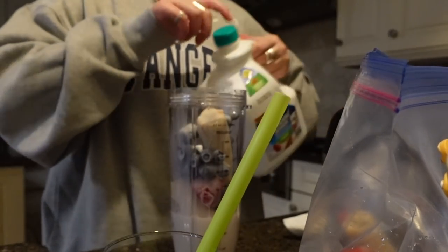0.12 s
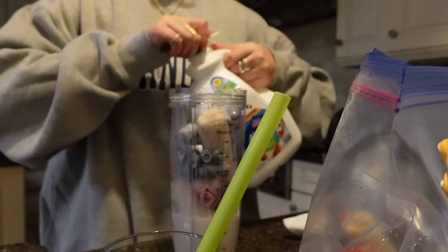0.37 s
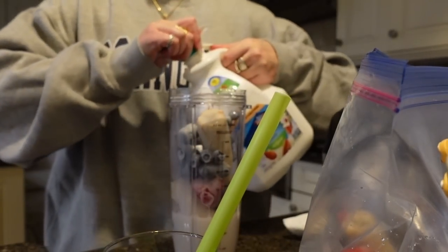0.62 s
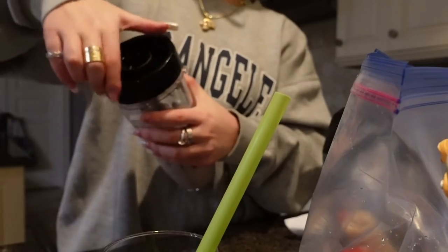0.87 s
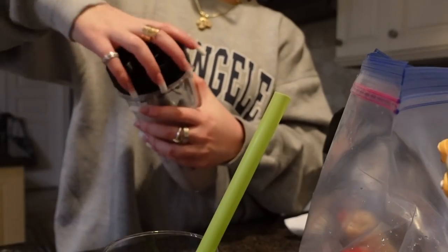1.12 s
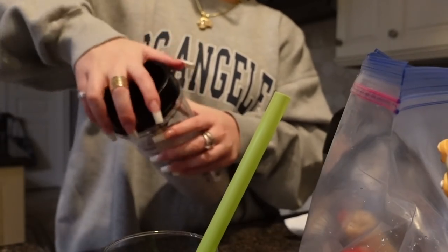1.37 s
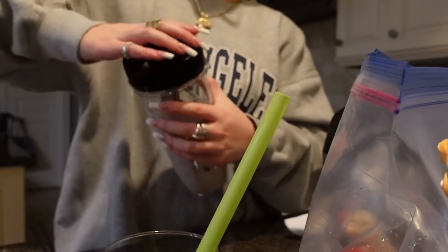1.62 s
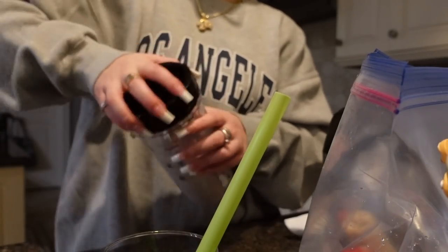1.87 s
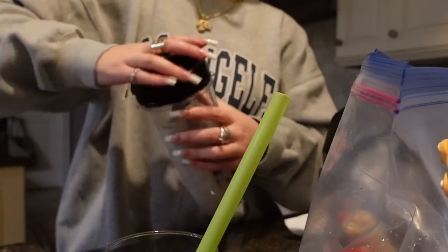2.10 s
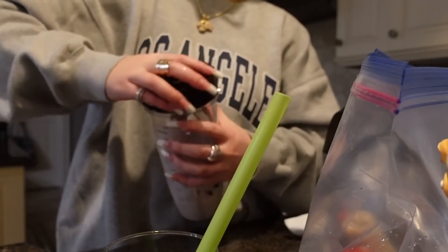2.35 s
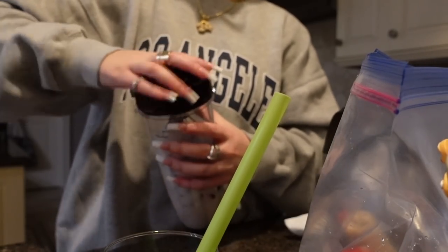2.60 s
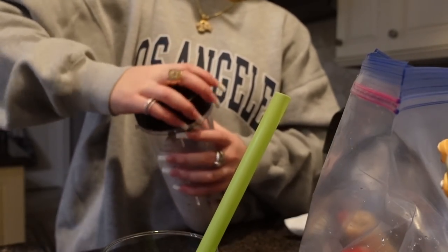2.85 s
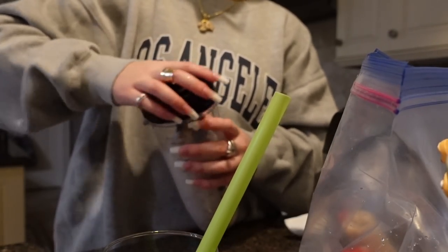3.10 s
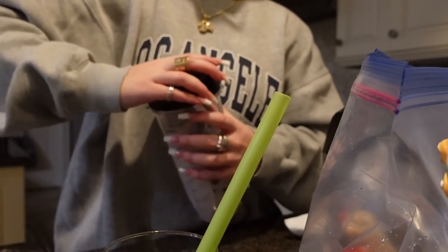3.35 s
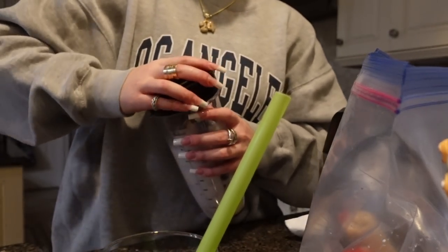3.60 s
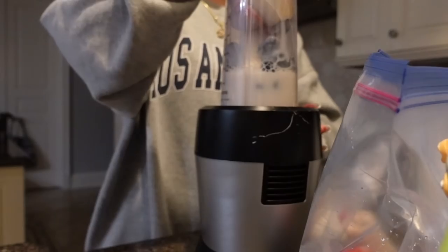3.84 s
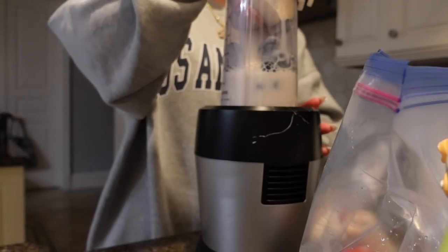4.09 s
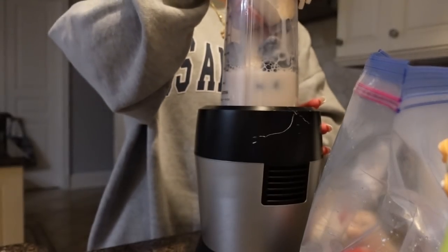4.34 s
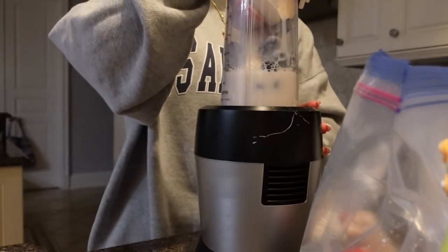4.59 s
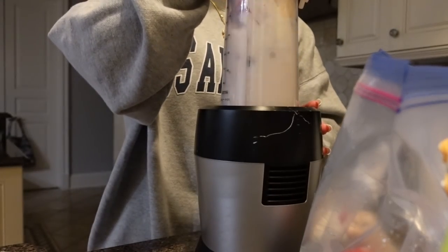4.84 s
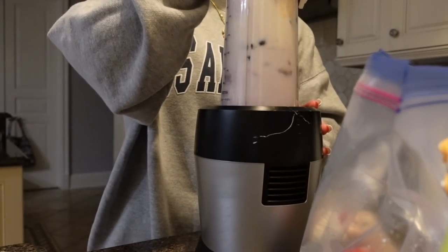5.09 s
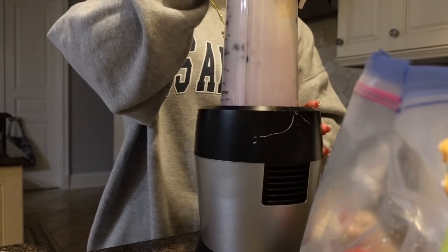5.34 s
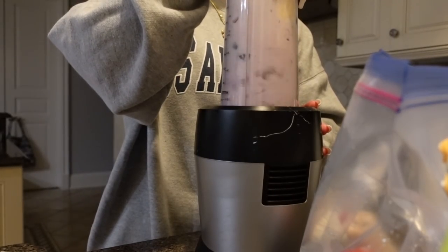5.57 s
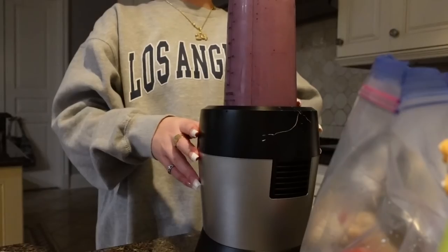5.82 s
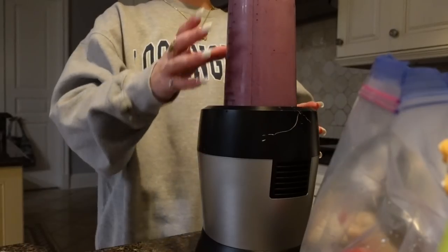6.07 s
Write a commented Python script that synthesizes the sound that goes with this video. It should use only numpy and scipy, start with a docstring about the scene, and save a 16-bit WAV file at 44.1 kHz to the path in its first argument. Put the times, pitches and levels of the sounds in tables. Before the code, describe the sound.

Plastic cup and lid clicking, scraping and knocking in a kitchen, one heavy thud, then a small blender roars up and whines down.

```python
"""A kitchen blender seen close up by two microphone ports: it is loaded and closed, then spins up and runs down.
Plastic ticks and scrapes are short noises coloured by the cup; steel blade and finger rings are ringing modes.
Skin and cloth hiss, and something heavy thuds on the counter. At 3.81 s the appliance hum, the rubbing and
the thud's boom all drop abruptly together; the cup clicks into its base and the motor starts: shaft tones,
chopping noise and roar. At 5.828 s it goes at once to coasting, with slot harmonics sweeping down."""
import sys
import numpy as np
from scipy import signal
from scipy.io import wavfile

SR = 44100
rng = np.random.default_rng(int(sys.argv[2]) if len(sys.argv) > 2 else 0)


def volts(x):
    """Linear amplitude factor 10**(x/20) for a level x in dB, scalar or array-like."""
    e = np.asarray(x, float) / 20
    return 10 ** e


def int16_out(signal):
    """Quantize to a 16-bit WAV file."""
    q = np.round(np.clip(np.atleast_2d(signal).T, -1, 1) * 32767)
    wavfile.write(sys.argv[1], SR, q.astype(np.int16))


N = 273420

# appliance background; rubbing and thud drop along with it at its third row: time_s, level_db
BACKGROUND_LEVEL = [(0, -41.5), (3.806, -41.5), (3.81, -54.5), (6.2, -50)]
# motor shaft, spinning up and then running down: time_s, speed_turns_per_s
SHAFT_SPEED = [(4.69, 60), (4.8, 120), (4.97, 190), (5.04, 212), (5.1, 228), (5.17, 235), (5.38, 244.5),
               (5.6, 253.5), (5.825, 254.5), (5.83, 287), (5.885, 267), (6.02, 200), (6.11, 160),
               (6.2, 127)]
# tones of the shaft ahead of the body resonances: multiple_of_speed, powered_rms_db, coasting_rms_db
SHAFT_ORDERS = [(1, -42.5, -56), (1.5, -39.5, -33.5), (2, -41, -44.5), (3, -41.5, -54), (4.5, -45, -75),
                (6, -44, -65), (12, -34.5, -71)]
# resonances of base and cup under power: pitch_hz, width_hz, lift_db
POWERED_BODY = [(307, 79, 4.5), (728, 36, 9), (2390, 65, -3), (2564, 44, 5), (2600, 25, 8.5),
                (2757, 34, 7.5), (2988, 170, 8), (3636, 50, 9), (5660, 430, 3)]
# resonances of base and cup when coasting: pitch_hz, width_hz, lift_db
COASTING_BODY = [(307, 33, 10.8), (750, 41, 9), (905, 24, 10.7), (1240, 63, 7), (1335, 82, 12.8),
                 (1443, 90, 8.4), (1920, 110, 5), (2980, 440, 6), (9500, 140, 8.2)]
COAST_S = 5.828  # the motor coasts from here


def rms_one(x):
    """Scale to rms 1."""
    return x / np.sqrt(np.mean(x ** 2) + 1e-20)


def in_time(rows):
    """Columns of a curve table, one value a sample."""
    s, *columns = np.transpose(rows)
    return [np.interp(np.arange(N) / SR, s, c) for c in columns]


def at_hz(points, hz):
    """Read a (Hz, value) table on a log axis."""
    table_hz, values = np.array(points)[:, 0], np.array(points)[:, 1]
    return np.interp(np.log(hz), np.log(table_hz), values)


def drift(rate_hz, size):
    """Slow chance with spread 1: low-passed noise, drawn every 40th sample and joined by lines."""
    r = np.exp(-80 * np.pi * rate_hz / SR)
    white = rng.standard_normal(size // 40 + 1002)
    slow = signal.lfilter([1], [1, -2 * r, r * r], white)[1000:]
    return np.interp(np.arange(size) / 40, np.arange(len(slow)), rms_one(slow))


def resonate(x, hz, width_hz):
    """Two-pole resonance with gain 1 on top."""
    r = np.exp(-np.pi * width_hz / SR)
    poles = [1, -2 * r * np.cos(2 * np.pi * hz / SR), r * r]
    return signal.lfilter([(1 - r * r) / 2, 0, (r * r - 1) / 2], poles, x + 1e-18)


def lift(x, modes):
    """Raise each resonance out of a broad sound."""
    return x + sum((volts(db) - 1) * resonate(x, hz, width) for hz, width, db in modes)


def ring(clicks, hz, t60):
    """A unit click sets a sine of height 1 ringing, down 60 dB after t60 seconds."""
    r, w = volts(-60 / (t60 * SR)), 2 * np.pi * hz / SR
    return signal.lfilter([0, np.sin(w)], [1, -2 * r * np.cos(w), r * r], clicks + 1e-18)


def band(x, low_hz, high_hz):
    """Butterworth band-pass."""
    return signal.sosfilt(signal.butter(2, [low_hz, high_hz], "band", fs=SR, output="sos"), x)


def noise(spectrum, size, modes=(), patchy_db=0., t60=None, side_db=None):
    """Stereo noise in about half-octave bands, each with level, flicker, width and optional decay; rms 1."""
    # usual stereo width at the ports: pitch_hz, side_against_mid_db
    usual_side = [(60, -9.5), (180, -19), (550, -9), (1650, -7), (4970, -10.5), (15000, -54)]
    if side_db is None:
        side_db = usual_side
    low_end, high_end = spectrum[0][0], spectrum[-1][0]
    edges = np.geomspace(low_end, high_end, 2 + int(2 * np.log2(high_end / low_end)))
    out, white = 0, rng.standard_normal((2, 2, size))
    for k, (low, high) in enumerate(zip(edges, edges[1:])):
        mid, side = band(white[k % 2], low, high)  # neighbouring bands use separate noise
        hz = np.sqrt(low * high)
        db = at_hz(spectrum, hz) + patchy_db * drift(26.5, size)
        if t60:
            db = db - 60 * np.arange(size) / SR / at_hz(t60, hz)
        out = out + volts(db) * (mid + volts(at_hz(side_db, hz)) * side * [[1], [-1]])
    return rms_one(lift(out, modes))


def background():
    """Broad appliance drone with wavering mains lines, over the sensor's hiss."""
    # drone spectrum: pitch_hz, relative_density_db
    drone = [(18, -63), (30, -28), (107, -9), (242, -1.5), (388, -8.5), (443, -11), (577, -11),
             (676, -18.5), (928, -24.5), (1800, -27.5), (2100, -38), (7090, -43), (15200, -55),
             (16500, -67)]
    # lines at the opening background level, before wavering: pitch_hz, peak_db
    hum_lines = [(119, -53), (204, -49), (241, -52), (479, -65), (899, -63.5)]
    t = np.arange(N) / SR
    level_db, first_db = in_time(BACKGROUND_LEVEL)[0], BACKGROUND_LEVEL[0][1]
    lines = sum(volts(db - first_db + 4.5 * drift(7.3, N)) * np.sin(2 * np.pi * hz * t) for hz, db in hum_lines)
    hum = volts(level_db) * (noise(drone, N, patchy_db=1.8) + lines)
    # the hiss follows the background by 0.4 dB per dB
    hiss = volts(-79 + .4 * (level_db - first_db)) * band(rng.standard_normal(N), 3000, 16000)
    return hum + hiss


def rubbing():
    """Fine friction hiss of skin and cloth in a low and a treble layer, until the motor starts."""
    # hands and cloth up to the abrupt drop: time_s, low_layer_db, treble_layer_db
    rub_levels = [(0.0, -53.5, -77), (0.2, -49.5, -62), (0.31, -53, -64), (0.66, -57, -73),
                  (0.9, -44.5, -66), (1.03, -55, -64), (1.73, -59, -62), (1.91, -49, -52),
                  (2.05, -61.5, -64), (2.33, -55, -61), (2.43, -54, -64.5), (2.88, -52, -63),
                  (3.29, -51.5, -72), (3.59, -52, -61), (3.8, -57, -67)]
    # low layer: pitch_hz, relative_density_db
    low_spectrum = [(710, -31.5), (1200, 5.5), (1830, -1), (2040, 5), (2520, -1.5), (4900, -6), (9000, -10),
                    (11700, -53), (19800, -120)]
    # treble layer: pitch_hz, relative_density_db
    treble_spectrum = [(3530, -39), (6000, 14), (10100, 2), (15200, 10.5), (16200, -11), (16500, -50)]
    time = np.arange(N)
    before = time < BACKGROUND_LEVEL[2][0] * SR
    low_db, treble_db = np.where(before, in_time(rub_levels), [[-71], [-81]])  # faint and steady afterwards
    low = volts(low_db) * noise(low_spectrum, N, patchy_db=.7)
    treble = volts(treble_db) * noise(treble_spectrum, N, patchy_db=.7)
    return (low + treble) * (time < SHAFT_SPEED[0][0] * SR)


def colour(contact, hz, octaves, treble_db):
    """Contact noise through the spot touched and the cup's modes, body peak 1, plus a bright edge."""
    # modes of the plastic cup: pitch_hz, width_hz, level_db
    cup_modes = [(1500, 300, -5), (2020, 350, -8), (3010, 350, -4), (4500, 500, -5), (5780, 500, -8),
                 (7200, 700, -5)]
    octaves = np.clip(octaves, .15, 1.5)
    edges = hz / 2 ** octaves, min(hz * 2 ** octaves, 16000)
    skirt = band(contact, *edges)
    spot = band(skirt, *edges) + 0.067 * skirt
    body = spot + sum(volts(db) * resonate(spot, f, w) for f, w, db in cup_modes)
    edge = band(contact, 5500, 14000)
    return body / abs(body).max() + volts(treble_db) * edge / abs(edge).max()


def ticks():
    """A hard first contact with a short rattle of grit after it.
    Row 0 reaches the ports directly; row 1, of like energy but broader in pitch, feeds the room's tail."""
    # plastic ticks: start_s, body_peak_db, centre_hz, spread_octaves, treble_edge_db
    tick_events = [(0.2825, -6.5, 4160, 0.89, -7), (0.582, -25.5, 3370, 0.96, -13),
                   (.957, -17.5, 2470, 0.97, -7), (1.227, -31, 8860, 0.86, -14),
                   (1.4952, -37, 9120, 0.5, -4), (1.731, -13.5, 2600, 0.68, -10.5),
                   (1.793, -15, 3880, 1.46, -3), (1.9526, -35.5, 10870, 0.96, -8),
                   (2.0461, -28, 1780, 0.83, -8.5), (2.2718, -9.5, 2730, 1.67, -12),
                   (2.511, -35, 4660, 1.7, -11), (2.555, -16, 3280, 1.08, -22),
                   (2.5874, -20.5, 2700, 1.7, -10), (2.7226, -20, 3900, 0.53, -11),
                   (2.752, -29, 4240, 0.29, -8), (2.795, -21.5, 1720, 0.73, -42),
                   (2.8022, -26, 3700, .32, -37), (2.8374, -18, 4700, 0.54, -11),
                   (2.86, -30, 3540, 0.77, -26), (2.872, -25.5, 5440, .64, -7),
                   (2.9379, -13.5, 4530, 0.44, -10), (2.963, -16.5, 3530, 1.04, -9),
                   (3.188, -24, 5540, 1.13, -3), (3.201, -17, 3500, 0.49, -23),
                   (3.3408, -14, 3040, 1.6, -10), (3.355, -28, 6040, 0.2, -33),
                   (3.53, -36.5, 4100, 0.75, -12), (3.665, -37.5, 4800, 0.44, -12),
                   (3.911, -21.5, 7060, 1.3, -9), (3.959, -21, 5000, 1.23, -9.5),
                   (4.0915, -27, 5500, 1.04, -12), (4.468, -20, 3360, 1.02, -8),
                   (4.494, -28, 4200, 1.48, -8), (4.6897, -23, 2230, 0.85, -26)]
    grit, decay_ms = .5, 2.13  # grit against the first contact, and its decay
    room_spread = 1.3  # the room hears each tick this much broader
    out, t = np.zeros((2, N + 2048)), np.arange(2048) / SR
    click = 1. * (t == 0)
    for s, db, hz, octaves, treble_db in tick_events:
        contact = grit * rng.standard_normal(2048) * np.exp(-t * 1000 / decay_ms)
        contact[0] = 1
        direct = colour(contact, hz, octaves, treble_db)
        even = colour(click, hz, octaves * room_spread, treble_db)
        pair = np.array([direct, rms_one(even) * direct.std()])
        out[:, round(s * SR):][:, :2048] += volts(db) * pair
    return out[:, :N]


def scrapes():
    """Short scrapes of thread or palm, and a low knock at 4.47 s: dense uneven grains, quick on and off."""
    # scrapes and the knock: middle_s, rms_db, centre_hz, spread_octaves, length_ms
    scrape_events = [(.6, -47, 2230, 0.37, 12), (0.694, -43, 4200, 1.12, 25), (.846, -42.5, 5030, 0.28, 37),
                     (0.888, -34.5, 4350, 0.75, 24), (0.92, -33, 4700, 0.7, 10), (0.927, -29, 4940, 1, 14),
                     (1.33, -51.5, 5270, 1.16, 116), (2.045, -42, 1590, 0.45, 24),
                     (2.615, -32.5, 1780, .47, 12.5), (3.162, -29, 1920, 0.27, 4.4),
                     (3.17, -43.5, 2440, 1.2, 51), (3.21, -49, 3500, .16, 22), (4.474, -41, 750, .6, 11.5)]
    out, t = np.zeros(N), np.arange(-4096, 4096) / SR
    grains = rng.standard_normal((len(scrape_events), 2, 8192))
    for (s, db, hz, octaves, ms), (grit, size) in zip(scrape_events, grains):
        envelope = np.exp(-.5 * (t * 2200 / ms) ** 4)
        treble_db = -4 + 8 * np.log2(hz / 4000)  # duller sounds have a weaker bright edge
        sound = colour(grit * volts(9.8 * size) * envelope, hz, octaves, treble_db)
        sound_rms = np.sqrt(np.sum(sound ** 2) / np.sum(envelope ** 2))
        out[round(s * SR) - 4096:][:8192] += volts(db) * sound / sound_rms
    return out


def tinks():
    """Each touch rings the modes of the metal thing touched, with a little chance in each mode."""
    # touches: start_s, strength_db, kind (0 = ring on the steel blade, 1 = ring on ring)
    touches = [(1.235, -29.5, 0), (1.5047, -43, 0), (2.6464, -52, 1), (2.6824, -56, 1), (2.7861, -36, 1),
               (3.1882, -38, 1), (3.2331, -41, 1), (3.363, -37.5, 1)]
    # modes of the blade, then of the rings: pitch_hz, level_db, t60_s
    metal_modes = [
        [(4188, -8, .05), (7730, -7, .05), (8317, -9, .09), (11500, -1, .03), (11900, 0, .035),
         (12830, -13, .05), (14190, -10, .04)],
        [(13400, -9, .035), (15400, 0, .05)],
    ]
    out = np.zeros(N)
    for kind, modes in enumerate(metal_modes):
        s, db = np.transpose([row[:2] for row in touches if round(row[2]) == kind])
        for hz, mode_db, t60 in modes:
            clicks = np.zeros(N)
            clicks[(s * SR).astype(int)] = volts(db + mode_db + rng.normal(0, 0.51, len(s)))
            out += ring(clicks, hz, t60)
    return out


def kitchen(x, diffuse):
    """One hard early echo, then a diffuse tail that dulls as it dies, slightly different at each port."""
    t60_s, treble_t60_s, wall_cut_hz = 0.81, .3, 2000
    echo_ms, echo_db, tail_db = 7.5, -9.5, -8
    t = np.arange(SR // 2) / SR
    tail = rng.standard_normal((2, len(t))) * volts(-60 * t / t60_s) * (t > .006)
    # the lasting part, and all that differs between ports
    dull = signal.sosfilt(signal.butter(1, wall_cut_hz, fs=SR, output="sos"), tail)
    tail = dull + (tail - dull) * volts(-60 * t / treble_t60_s)  # treble dies by this on top of t60_s
    both_ports = tail[0] + volts(-12) * dull[1] * [[1], [-1]]
    answer = volts(tail_db) * both_ports / np.sqrt(np.sum(tail[0] ** 2))
    early = np.zeros((2, SR // 20))
    early[:, round(echo_ms * SR / 1000)] = volts(echo_db)
    # direct sound reaches the left port a fraction of a sample early
    early[:, :2] = 0.16 * np.array([[0.41, 0.32], [-0.96, 0.94]])
    echo = signal.fftconvolve(x[None], early, axes=1)[:, :N]
    return x + echo + signal.fftconvolve(diffuse[None], answer, axes=1)[:, :N]


def thud():
    """A soft heavy blow and its bounce ring the counter; the room booms, cut off at the abrupt drop."""
    # modes of the counter: pitch_hz, level_db, t60_s
    counter_modes = [(122.2, -21, 0.29), (171, -7, 0.066), (197.6, 3, 0.1), (261, -14.5, 0.18),
                     (377.4, -13, 0.33), (473, -23.5, 0.48), (720, -21, 0.036), (1360, -38, 0.071)]
    # room answer to the thud: pitch_hz, relative_density_db
    boom_spectrum = [(29, -61), (50, -19), (246, 10), (288, -8), (383, 2.5), (429, -13), (501, -16),
                     (639, -16), (825, -23), (1500, -30.5), (1950, -73), (3300, -120)]
    # its decay: pitch_hz, t60_s
    boom_decay = [(60, 0.79), (120, 0.32), (250, 0.87), (500, 0.94), (1000, 1)]
    blow_s, bounce_s, blow_db, bounce_db = 2.964, 2.981, -1.5, -6
    start, click, out = round(blow_s * SR), np.zeros(N), np.zeros((2, N))
    click[[start, round(bounce_s * SR)]] = volts(blow_db), volts(bounce_db)
    out += band(sum(volts(db) * ring(click, hz, t60) for hz, db, t60 in counter_modes), 123, 1640)
    swell = 1 - np.exp(-np.arange(SR) / SR / 0.0041)
    out[:, start:start + SR] += volts(-26.5) * swell * noise(boom_spectrum, SR, t60=boom_decay)
    return out * (np.arange(N) < BACKGROUND_LEVEL[2][0] * SR)


def shaft_tones(turn, speed, coasting):
    """Wavering multiples of the shaft turn ring base and cup; they rise out of the roar near full speed."""
    full_speed, rise_db_per_octave = 240, 18  # turns per s; the rise acts under power only
    tones = 0
    for k, on_db, off_db in SHAFT_ORDERS:
        db = np.where(coasting, off_db, on_db) + 2.7 * drift(12, len(turn))
        tones = tones + volts(db) * np.sqrt(2) * np.sin(k * turn)
    tones = tones * volts(rise_db_per_octave * np.log2(np.minimum(speed / full_speed, 1)) * ~coasting)
    return np.where(coasting, lift(tones, COASTING_BODY), lift(tones, POWERED_BODY))


def slot_whine(turn, speed, coasting):
    """Slot harmonics, multiples of 12 turns, sweep down through fixed resonances while coasting."""
    # resonances of the whine: pitch_hz, width_hz, level_db
    slot_modes = [(9600, 400, 1), (9000, 700, -2), (8400, 600, -2), (7600, 700, -7), (10700, 500, -13),
                  (14400, 1800, -13), (12600, 900, -14)]
    slots = 0
    for k in range(3, 11):
        waver = 1 + .5 * drift(150, len(turn))
        slots = slots + np.sin(12 * k * turn) * (12 * k * speed < 16000) * waver
    whine = sum(volts(db) * resonate(resonate(slots, hz, w), hz, w) for hz, w, db in slot_modes)
    return volts(-33) * whine * coasting


def chopping(t, turn, speed, coasting):
    """Base rumble, cup rattle, blade and air roar, hiss: noise ranges that throb once every two turns."""
    # noise under power: pitch_hz, relative_density_db
    powered_spectrum = [(35, -62), (60, -23.5), (354, 3.5), (408, -2), (553, -11), (732, 0), (822, -6),
                        (1110, 2), (1660, -2), (2970, -6.5), (4030, -8), (5720, -12.5), (16000, -28)]
    # noise when coasting: pitch_hz, relative_density_db
    coasting_spectrum = [(35, -70), (60, -36), (338, 2.5), (469, -20), (903, -8.5), (1060, -5), (1340, -10),
                         (2410, -14), (3040, -18), (6900, -32), (9570, -32.5), (16000, -36)]
    # stereo width of the motor: pitch_hz, side_against_mid_db
    motor_side = [(60, -28), (110, -34), (200, -41), (380, -23), (700, -16), (1290, -58), (2380, -17),
                  (4400, -50), (8120, -29.5), (15000, -23.5)]
    # ranges: low_hz, high_hz, throb_0_to_1, labouring_db, running_db, per_chunk_db, coasting_db,
    # coasting_change_db_per_s
    noise_ranges = [(40, 510, 0.09, -32.5, -37.5, 13.5, -28.5, 11.5),
                    (593, 1840, 0.12, -41.5, -29, 4, -25.5, -6),
                    (1820, 3160, 0.13, -42, -26, -3, -26.5, -20),
                    (4480, 14200, 0.09, -39, -25.5, -4, -28.5, -5.5)]
    # big chunks break up: middle_s, strength
    chunk_events = [(4.869, 1.17), (5.029, 0.37)]
    bite_s, bite_rise_s, chunk_s = 4.81, 0.022, 0.046
    base_hz, base_width_hz, shake_db = 306.4, 16, 4
    size = len(t)
    bite = .5 + .5 * np.tanh((t - bite_s) / bite_rise_s)  # the blade labours, then bites into the fruit
    chunks = sum(strength * np.exp(-.5 * ((t - s) / chunk_s) ** 2) for s, strength in chunk_events)
    # the base shakes when a low multiple of the slowing shaft meets its resonance
    shake = sum(np.exp(-.5 * ((k * speed - base_hz) / base_width_hz) ** 2) for k, *_ in SHAFT_ORDERS[:3])
    coasting_wash = noise(coasting_spectrum, size, COASTING_BODY, .7, side_db=motor_side)
    powered_wash = noise(powered_spectrum, size, POWERED_BODY, .7, side_db=motor_side)
    wash = np.where(coasting, coasting_wash, powered_wash)
    share = coasting.mean()
    out = np.zeros((2, size))
    for low_hz, high_hz, throb, labour_db, run_db, chunk_db, coast_db, change_db in noise_ranges:
        powered_db = labour_db + (run_db - labour_db) * bite + chunk_db * chunks
        coasting_db = coast_db + change_db * (t - COAST_S) + shake_db * shake * (low_hz < base_hz)
        db = np.where(coasting, coasting_db, powered_db) + drift(12.2, size)  # lumpy by 1 dB
        part = band(wash, low_hz, high_hz) * (1 + throb * np.sin(turn / 2))
        # rms 1 within each of the two states
        off_part = rms_one(part * coasting) * share ** .5
        on_part = rms_one(part * ~coasting) * (1 - share) ** .5
        # opposite signs let neighbouring ranges join without a gap
        out = volts(db) * np.where(coasting, off_part, on_part) - out
    return out


def blender():
    """One wavering shaft turn drives tones, slot whine and chopping noise; mains hums under power."""
    start = round(SHAFT_SPEED[0][0] * SR)
    size = N - start
    t, speed = np.arange(start, N) / SR, in_time(SHAFT_SPEED)[0][start:]
    turn = 2 * np.pi * np.cumsum(speed * (1 + 0.0059 * drift(40.3, size))) / SR
    coasting = np.arange(start, N) >= round(COAST_S * SR)
    mains_tone = np.sin(2 * np.pi * 120 * np.arange(size) / SR)
    mains = volts(-51.5 + 3.9 * drift(7.1, size)) * mains_tone * ~coasting
    out = np.zeros((2, N))
    out[:, start:] = chopping(t, turn, speed, coasting)
    out[:, start:] += shaft_tones(turn, speed, coasting) + slot_whine(turn, speed, coasting) + mains
    return out


def scene():
    """Handling sounds in the room, with rubbing, thud, motor and background."""
    direct, diffuse = ticks() + scrapes() + tinks()
    return kitchen(direct, diffuse) + rubbing() + thud() + blender() + background()


def roll_off(x):
    """The treble ends steeply here."""
    return signal.sosfilt(signal.butter(12, 16660, fs=SR, output="sos"), x)


def record(dry):
    """The microphone ports drop the deep bass, and peaks beyond full scale are clipped."""
    no_deep_bass = signal.sosfilt(signal.butter(2, 55.0, "high", fs=SR, output="sos"), dry)
    mix = np.clip(no_deep_bass, -1, 1)
    return roll_off(mix)


dry = scene()
out = record(dry)
int16_out(out)
```